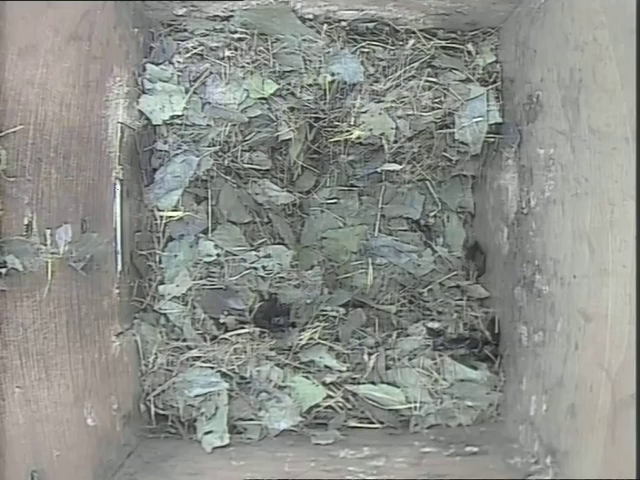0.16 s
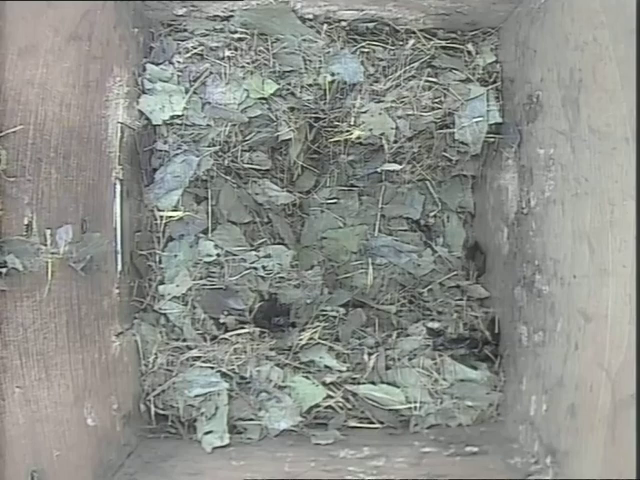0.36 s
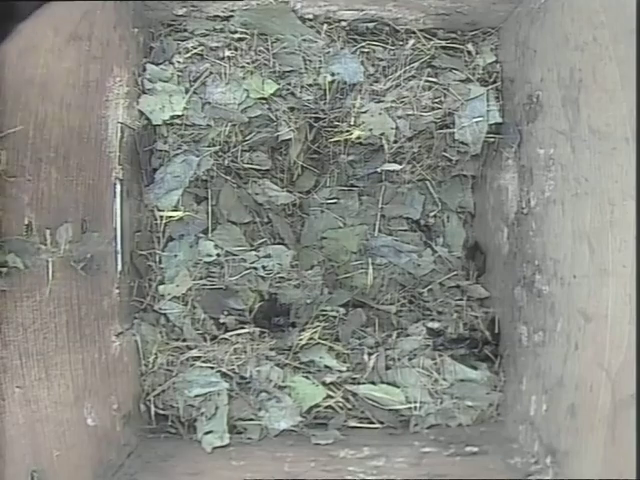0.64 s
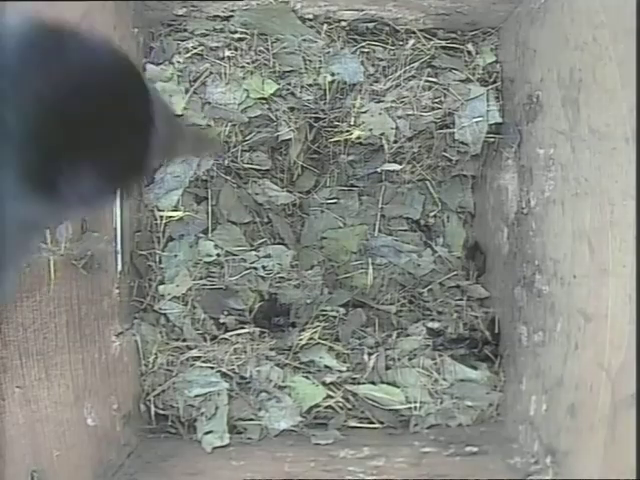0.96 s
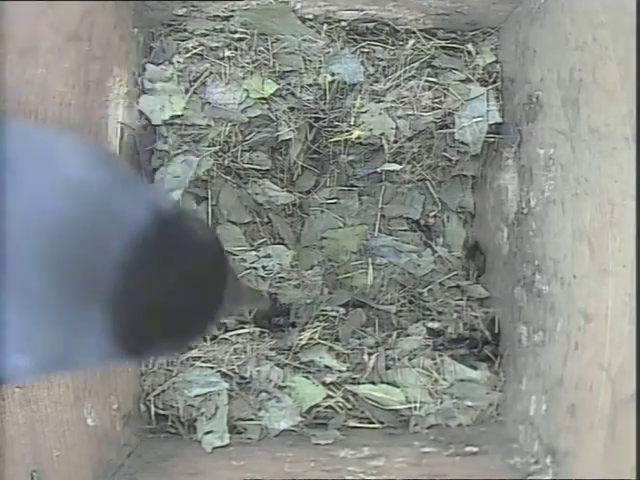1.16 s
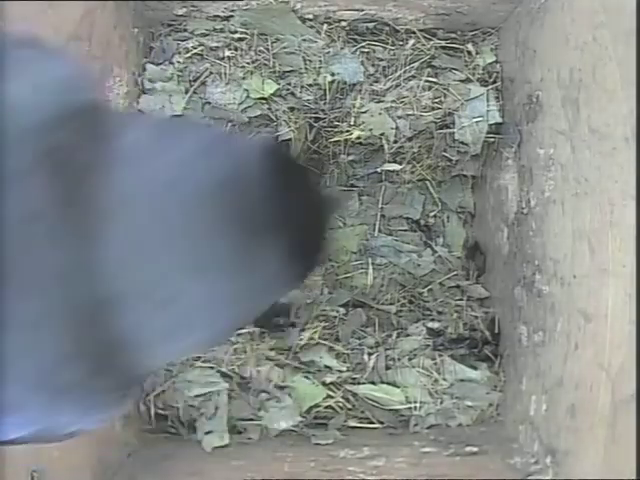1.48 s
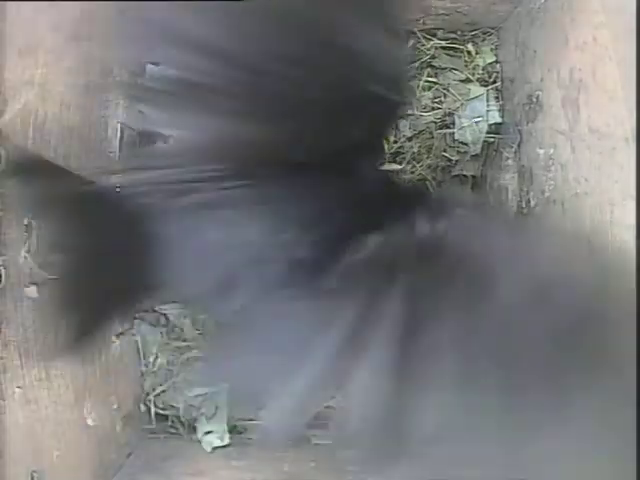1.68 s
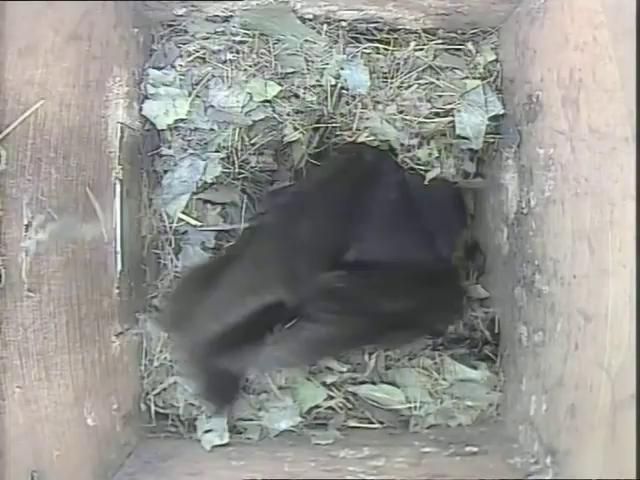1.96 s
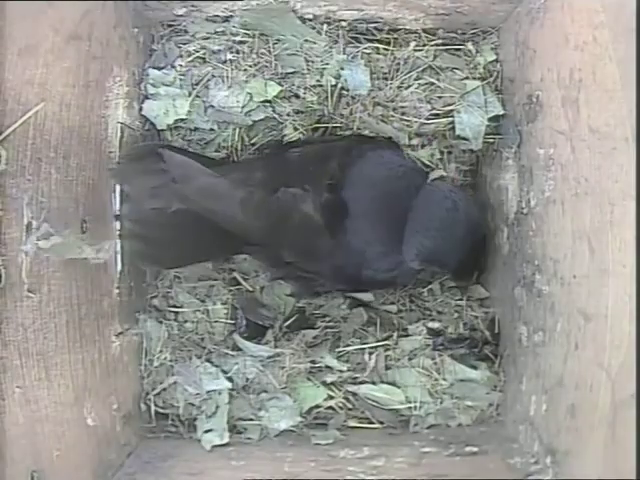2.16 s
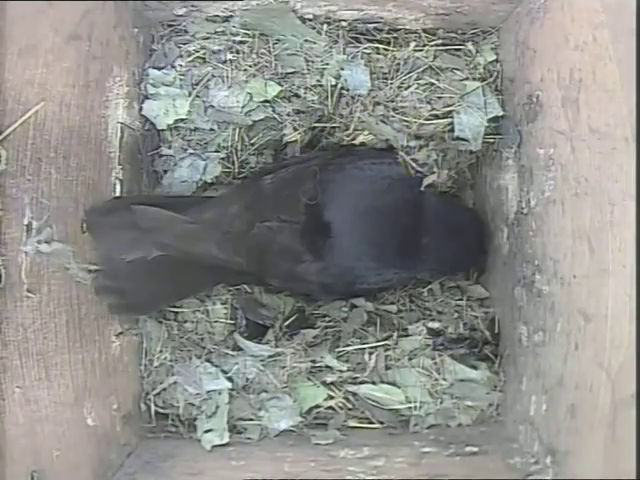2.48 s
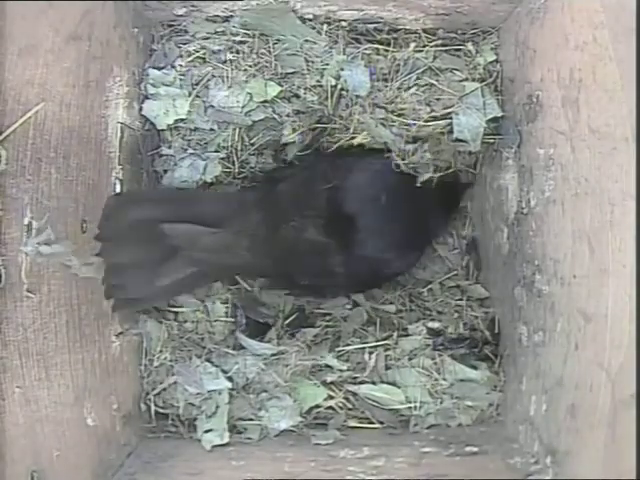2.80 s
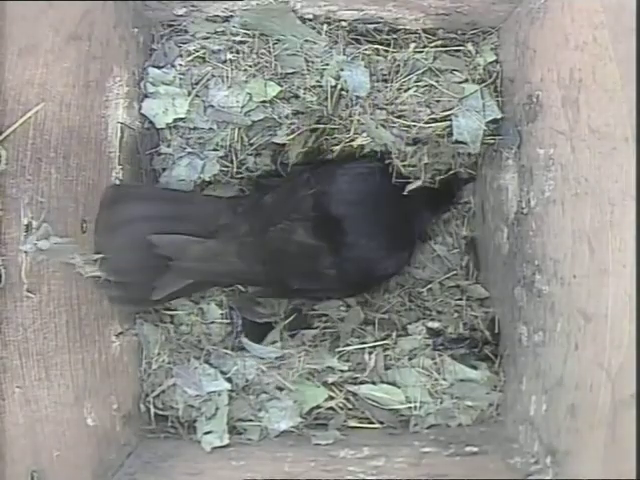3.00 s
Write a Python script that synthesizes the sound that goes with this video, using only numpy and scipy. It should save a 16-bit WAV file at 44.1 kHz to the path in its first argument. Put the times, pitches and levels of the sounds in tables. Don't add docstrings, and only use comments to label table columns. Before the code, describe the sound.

Claw scratches and a rattling burst of wingbeats in a small wooden box, then leafy shuffling

```python
import sys
import numpy as np
from scipy import signal
from scipy.fft import rfft, irfft
from scipy.io import wavfile
from scipy.ndimage import uniform_filter1d, map_coordinates

SR = 44100
rng = np.random.default_rng(int(sys.argv[2]) if len(sys.argv) > 2 else 0)


def unload_wav(signal):
    wavfile.write(
        sys.argv[1],
        SR,
        np.round(np.clip(np.atleast_2d(signal).T, -1, 1) * 32767).astype(np.int16),
    )


def amplitude_ratio(level_db):
    exponent = np.asarray(level_db, float) / 20
    return 10 ** exponent


N = 138474


def bandpass(x, hz, width):
    return signal.lfilter(*signal.iirpeak(hz, hz / width, fs=SR), x)


def lowpass(x, hz, order):
    return signal.sosfilt(signal.butter(order, hz, fs=SR, output="sos"), x)


def unit(x):
    return x / np.sqrt(np.mean(x ** 2))


def colour(x, points):
    corners = np.array(points)
    hz = np.arange(N // 2 + 1) * SR / N + 1
    gain_db = np.interp(np.log(hz), np.log(corners[:, 0]), corners[:, 1])
    return unit(irfft(rfft(x) * amplitude_ratio(gain_db), N))


def walk(rate):
    k = int(SR / rate)
    smooth = uniform_filter1d(rng.standard_normal(N), k)
    return unit(uniform_filter1d(smooth, k))


def crackle(grain_db):
    grain = 24
    loudest = 2.4
    size = amplitude_ratio(grain_db * np.minimum(rng.exponential(size=N // grain + 1), loudest))
    return unit(np.repeat(size, repeats=grain)[:N] * rng.standard_normal(N))


def scrapes(rows):
    out, clicks = np.zeros(N + SR), crackle(3.5)
    t = np.arange(SR // 10) / SR
    for peak_s, db, length, hz in rows:
        start = int((peak_s - 0.45 * length) * SR)
        swell = np.minimum(t / (0.5 * length), 1)
        stop = np.exp(-(t / (1.247 * length)) ** 3.5)
        shape = swell * stop
        swarm = shape * np.resize(clicks[start:start + len(t)], len(t))
        swarm = bandpass(swarm, hz, 0.68 * hz)
        swarm = bandpass(swarm, hz, 1.9 * hz)
        swarm = swarm + amplitude_ratio(-8) * bandpass(swarm, hz, 0.1 * hz)
        out[start:start + len(t)] += amplitude_ratio(db - 10.5) * swarm * np.linalg.norm(shape) / np.linalg.norm(swarm)
    return out[:N]


def box(x, tones):
    out = amplitude_ratio(-6) * x
    for k, (hz, width, db) in enumerate(tones):
        out = out + (-1) ** k * amplitude_ratio(db) * bandpass(x, hz, width)
    return out


def box_near_hole(x):
    # f/Hz, width/Hz, level/dB
    upper_tones = [(1247, 16, 10.5), (1560, 420, 0.5), (2310, 73, -8), (2900, 101, 6.5), (3254, 37, -1.5),
                   (3540, 84, 5), (4430, 65, -21.5), (4860, 84, 6), (6000, 63, -15), (6690, 155, 1)]
    return box(x, upper_tones)


def box_near_floor(x):
    # f/Hz, width/Hz, level/dB
    floor_tones = [(2290, 240, -9.5), (3520, 59, 0.5), (4790, 93, -9.5), (5930, 130, -14), (6880, 610, -11)]
    return box(x, floor_tones)


def entrance(x):
    return bandpass(x, 1220, 70) - bandpass(x, 1479, 97)


def air():
    # f/Hz, level/dB
    air_colour = [(15, -38), (25, -8), (92, -2), (279, -10), (308, -9.5), (475, -14), (666, -17),
                  (1480, -20.5), (8000, -36), (10400, -70), (17600, -120)]
    wide = colour(rng.standard_normal(N), air_colour) * amplitude_ratio(-56.5 + 1.0 * walk(8.3))
    hole = unit(entrance(rng.standard_normal(N)))
    return wide + hole * amplitude_ratio(-65.5 + 2.2 * walk(6))


def leaves(t):
    # t/s, level/dB
    stirring = np.array([(0.112, -72.5), (0.242, -55.5), (.28, -66.5), (.62, -64.5), (.7, -56), (.8, -54),
                         (.86, -58), (1.2, -62.5), (1.34, -58.5), (1.671, -47), (1.761, -49.5),
                         (1.899, -48.5), (2.04, -56), (2.08, -63), (2.34, -60), (2.38, -68), (2.799, -71.5),
                         (3.099, -51.5)])
    # f/Hz, level/dB
    leaf_colour = [(290, -85), (500, -36.5), (555, -24), (853, -17.5), (1280, -17.5), (4750, -8.5),
                   (8000, -13.5), (10400, -11), (17600, -120)]
    stir_db = np.interp(t, stirring[:, 0], stirring[:, 1])
    return colour(crackle(2.2), leaf_colour) * amplitude_ratio(stir_db + 0.34 * walk(90) + 6.5)


def claws():
    # t/s, peak level/dB, length/s, colour f/Hz
    scratches = [(.14, -29, 0.012, 3440), (.148, -31.5, 0.01, 3700), (.198, -34, 0.0085, 3380),
                 (.21, -37, 0.017, 2960), (.224, -27, 0.0044, 4940), (.238, -44.5, 0.011, 5000),
                 (.2475, -16.5, 0.01, 4400), (.249, -15.5, 0.0042, 3370), (.254, -21.5, 0.0065, 2300),
                 (.259, -33, 0.0053, 2010), (.522, -37, 0.029, 4860), (.6415, -25, 0.0025, 6000),
                 (.643, -30, 0.0044, 3150), (.659, -33, .005, 4700), (.666, -30, 0.006, 4800),
                 (.69, -41, 0.008, 5500), (.7, -39.5, 0.022, 3040), (.703, -39.5, .012, 4800),
                 (.723, -30.5, .01, 5700), (.735, -34.5, 0.013, 4000), (.746, -30, 0.0044, 4500),
                 (.755, -33, 0.016, 4000), (.777, -14.5, 0.0033, 4700), (.781, -22.5, .005, 4400),
                 (.789, -22.5, 0.01, 4740), (.809, -32.5, 0.0055, 3560), (.815, -40, 0.024, 3700),
                 (.844, -40, .005, 5500), (.891, -35, .006, 5800), (.932, -24, 0.003, 4500),
                 (.9365, -25, 0.0047, 3630), (.947, -34.5, 0.011, 4000), (.958, -34, 0.014, 5760),
                 (.975, -39.5, 0.014, 5000), (1.061, -39, .008, 3180), (1.093, -27, 0.0073, 3660),
                 (1.105, -25.5, 0.0081, 5030), (1.116, -36, 0.0055, 6230), (1.144, -34, 0.0054, 4150),
                 (1.317, -33, .008, 6000), (1.362, -29, 0.0055, 3060), (1.369, -29, 0.0074, 2900),
                 (1.385, -37, 0.0041, 4500), (1.401, -35, 0.0096, 2760), (1.426, -23, 0.0038, 4540),
                 (1.433, -33, 0.02, 3000), (1.446, -25.5, 0.0077, 3280), (1.45, -21, 0.01, 5500),
                 (1.464, -27, 0.012, 4800), (1.479, -27.5, 0.0062, 3000)]
    return scrapes(scratches)


def rim():
    # t/s, peak level/dB, length/s, colour f/Hz
    brushes = [(.142, -39, 0.013, 1370), (.254, -44, 0.0083, 1590), (.752, -44.5, 0.018, 1350),
               (.82, -43.5, 0.007, 1320), (1.323, -38.5, 0.0095, 1300), (1.362, -33.5, .005, 1380),
               (1.371, -33.5, 0.0091, 1390), (1.401, -40, .006, 1350), (1.427, -35, 0.017, 1400),
               (1.447, -38, 0.011, 1320), (1.46, -44, 0.02, 1350), (1.48, -54, .008, 1280),
               (1.598, -43, 0.014, 1250), (1.648, -38, .012, 1310), (1.692, -52, 0.0066, 1390),
               (1.731, -38.5, 0.0089, 1310), (1.795, -42, 0.01, 1250), (1.852, -46, 0.0085, 1250),
               (1.87, -56, 0.013, 1250), (2.86, -48.5, 0.023, 1410), (3.014, -41, 0.01, 1390)]
    return amplitude_ratio(8) * entrance(scrapes(brushes))


def songbirds(t):
    # t/s, level/dB
    chirps = [
        (0.147, -50.5),
        (0.327, -50.5),
        (0.508, -50),
        (0.684, -53.5),
    ]
    # t/s, length/s, level/dB, start f/Hz, end f/Hz
    whistles = [
        (1.217, .078, -52.5, 5550, 5250),
        (1.362, .06, -53, 6900, 4650),
        (1.015, .135, -64, 7500, 7480),
    ]
    out = np.zeros(N)
    pure_share = 2.5
    rasp = pure_share + walk(300)
    rise_s, hold_s, hold_db = .046, .054, -9
    for s, db in chirps:
        rise = s + rise_s
        end = rise + hold_s
        hz = np.interp(t, [s, s + .016, rise, end], [4400, 4850, 6120, 6120 * .99])
        shape = np.interp(t, [s, s + 0.011, rise, rise + 0.008, end - .01, end],
                          [0, 1, 1, amplitude_ratio(hold_db), amplitude_ratio(hold_db), 0])
        out += amplitude_ratio(db) * shape * np.sin(2 * np.pi * np.cumsum(hz) / SR)
    for s, length, db, from_hz, to_hz in whistles:
        sag = np.exp(-np.maximum(t - s, 0) / .014)
        hz = to_hz + (from_hz - to_hz) * sag
        shape = np.interp(t, [s, s + 0.0031, s + length - .01, s + length], [0, 1, 1, 0])
        out += amplitude_ratio(db) * shape * np.sin(2 * np.pi * np.cumsum(hz) / SR)
    out = out * rasp / pure_share
    echo_t60_s, echo_db = .2, -3
    tail = rng.standard_normal(SR // 4) * amplitude_ratio(-60 * t[:SR // 4] / echo_t60_s)
    return out + amplitude_ratio(echo_db) * signal.fftconvolve(out, tail / np.linalg.norm(tail))[:N]


def thumps(t):
    # t/s, peak level/dB, f/Hz, time to fall by 60 dB/s
    landings = [
        (0.257, -39, 259.3, 0.15),
        (.79, -45.5, 293, 0.17),
        (0.943, -44.5, 271, 0.2),
        (1.566, -33, 274.5, 0.053),
        (1.611, -40, 270, 0.088),
        (1.709, -43, 290, 0.15),
        (1.865, -34, 210, 0.034),
        (1.869, -47, 79.6, 0.3),
        (1.565, -45, 478, 0.071),
    ]
    out = np.zeros(N)
    for s, db, hz, t60 in landings:
        since = np.maximum(t - s, 0)
        ring = np.sin(2 * np.pi * hz * since)
        ring += .5 * np.sin(2 * np.pi * hz * 0.72 * since)
        ring += 0.16 * np.sin(2 * np.pi * hz * 1.4 * since)
        out += amplitude_ratio(db - 60 * since / t60) * np.minimum(since / 0.0024, 1) * ring
    return out


def wings():
    # t/s, peak level/dB, length/s, colour f/Hz
    strokes = [(1.499, -18.5, 0.0044, 4830), (1.507, -16.5, 0.0047, 5330), (1.516, -37.5, 0.009, 3240),
               (1.527, -22, 0.006, 5200), (1.532, -29.5, 0.01, 3500), (1.543, -19.5, 0.015, 4160),
               (1.553, -15.5, 0.0043, 5200), (1.558, -22.5, 0.0068, 5770), (1.558, -19.5, 0.013, 2900),
               (1.565, -12.5, 0.0044, 5270), (1.572, -46, 0.004, 3000), (1.589, -21.5, 0.0056, 4950),
               (1.597, -22.5, 0.0062, 5000), (1.602, -35, 0.011, 3260), (1.622, -23.5, 0.0048, 2960),
               (1.626, -5.5, 0.0027, 5640), (1.63, -20.5, 0.014, 4700), (1.641, -14.5, 0.0018, 4970),
               (1.646, -13.5, .006, 4550), (1.652, -9.5, 0.0037, 5660), (1.657, -27.5, 0.0045, 4060),
               (1.685, -15, 0.0043, 4860), (1.689, -23, .005, 5400), (1.693, -19, 0.0028, 4600),
               (1.707, -21.5, .01, 4780), (1.717, -15, .004, 4830), (1.723, -20.5, 0.0077, 4400),
               (1.731, -13.5, 0.0029, 4760), (1.74, -27, 0.0072, 4040), (1.784, -28.5, 0.011, 6500),
               (1.793, -34, 0.014, 4830), (1.805, -34, .014, 6000), (1.85, -23, 0.023, 5560),
               (1.857, -21, 0.0094, 6430), (1.8665, -13.5, 0.0034, 6000), (1.871, -20.5, 0.0093, 6560),
               (1.877, -25.5, 0.0093, 5360), (1.886, -24, 0.013, 6000), (1.856, -26.5, 0.033, 2200),
               (1.902, -29, 0.02, 5700), (1.915, -32, 0.03, 5700)]
    return scrapes(strokes)


def gust(t):
    middle_s, length_s = 1.65, 0.16
    wind = unit(bandpass(rng.standard_normal(N), 70, 120))
    return amplitude_ratio(-53) * wind * np.exp(-((t - middle_s) / length_s) ** 2)


def feet():
    # t/s, peak level/dB, length/s, colour f/Hz
    steps = [(2.145, -42, .022, 6750), (2.236, -38.5, 0.02, 5700), (2.262, -38.5, 0.0066, 6400),
             (2.294, -32.5, 0.004, 6000), (2.324, -36, 0.0034, 5000), (2.342, -38, .0063, 2940),
             (2.845, -40.5, 0.027, 5000), (2.858, -45, 0.0092, 4760), (2.865, -33, 0.0039, 5170),
             (2.879, -27.5, 0.011, 5750), (2.896, -39, 0.0091, 4800), (2.972, -44, .014, 4770),
             (2.99, -38, 0.047, 5470), (3.013, -23.5, 0.006, 5300), (3.021, -46, 0.0066, 5460),
             (3.059, -31, 0.0041, 4800), (3.068, -40, 0.0085, 5500), (3.099, -33.5, .014, 4900)]
    return scrapes(steps)


def scene():
    t = np.arange(N) / SR
    above = box_near_hole(claws() + wings()) + rim()
    below = box_near_floor(feet() + leaves(t))
    return (above + below + thumps(t) + songbirds(t) + gust(t) + air())[None]


def band_limit(x):
    return signal.sosfilt(signal.butter(12, 9590, fs=SR, output="sos"), x)


def record(dry):
    t = np.arange(N) / SR
    rate_hz, drops_per_s, first_drop_s = 16000, 300, .0021
    offset, starts_s = .0062, .1125
    lag = ((t - first_drop_s) * drops_per_s % 1 - .5) / rate_hz
    x = lowpass(dry[0], 7650, order=24)
    x = map_coordinates(x, [(t - lag) * SR], mode="nearest")[None]
    x = x * (1 + 2 * np.cos(2 * np.pi * rate_hz * t))
    x = (x + offset) * (t > starts_s)
    x = lowpass(x, 7580, order=9)
    x = lowpass(x, 8370, order=24)
    return band_limit(x)


dry = scene()
out = record(dry)
unload_wav(out)
```